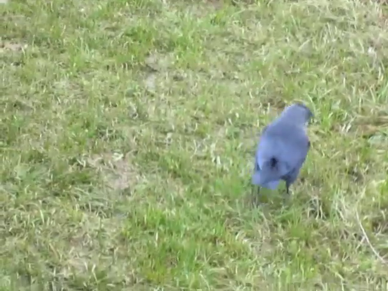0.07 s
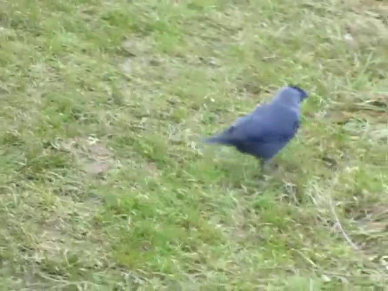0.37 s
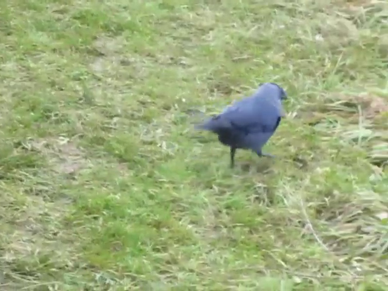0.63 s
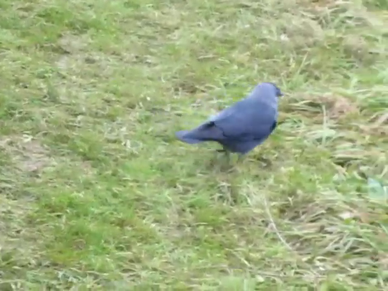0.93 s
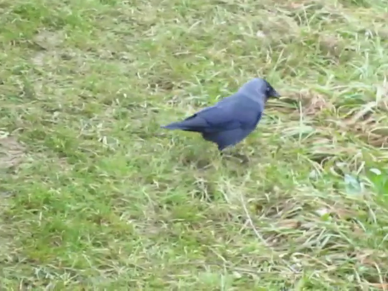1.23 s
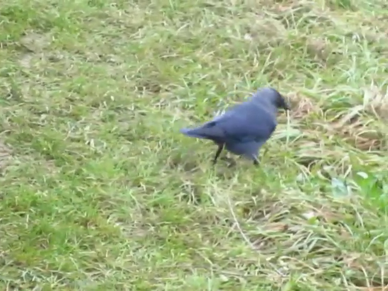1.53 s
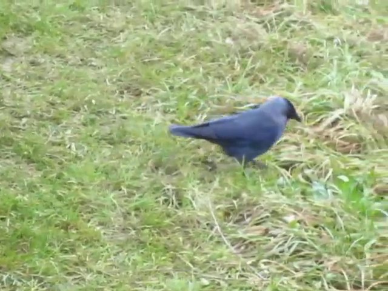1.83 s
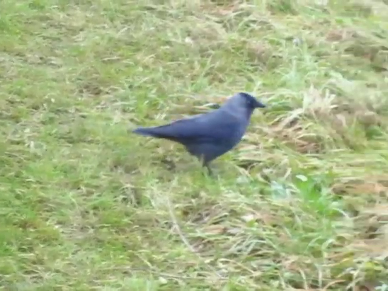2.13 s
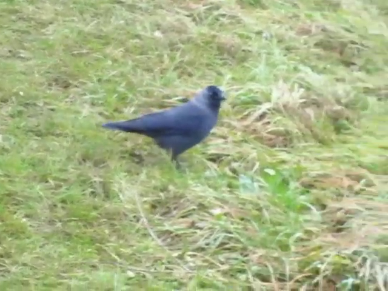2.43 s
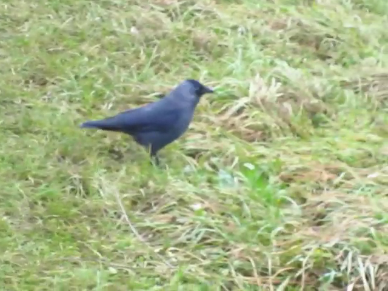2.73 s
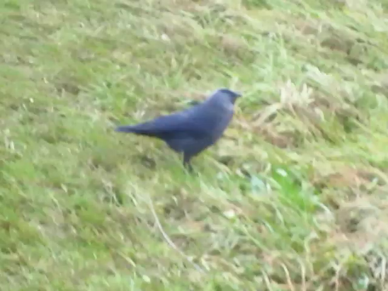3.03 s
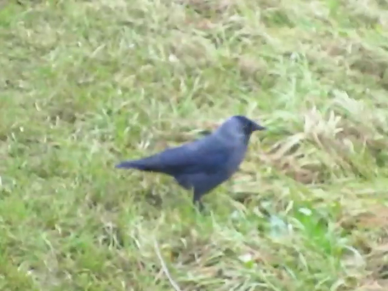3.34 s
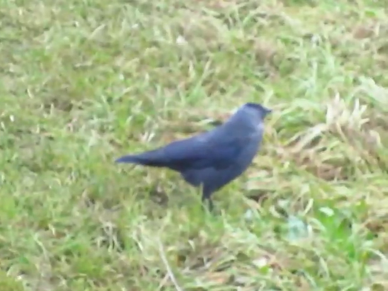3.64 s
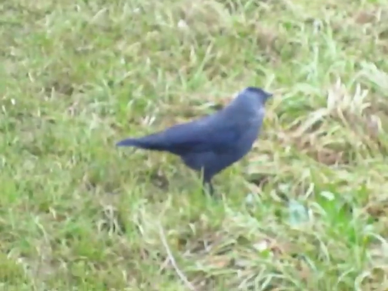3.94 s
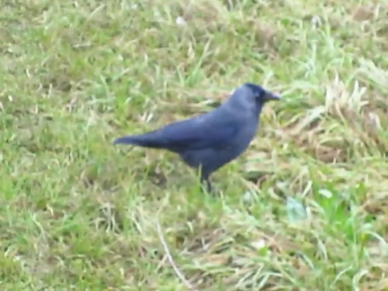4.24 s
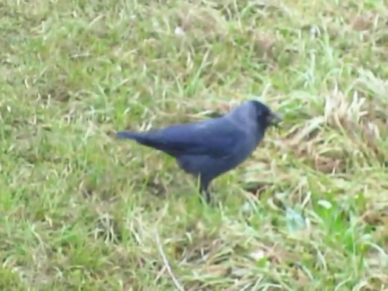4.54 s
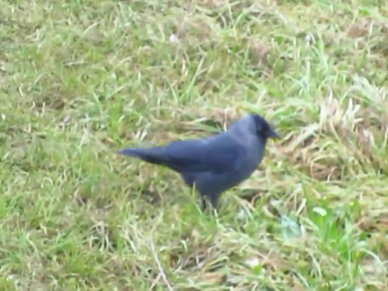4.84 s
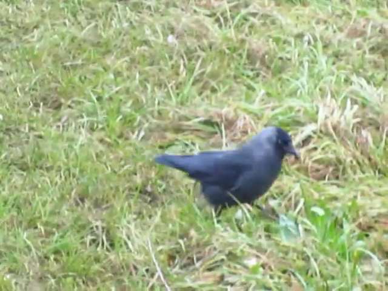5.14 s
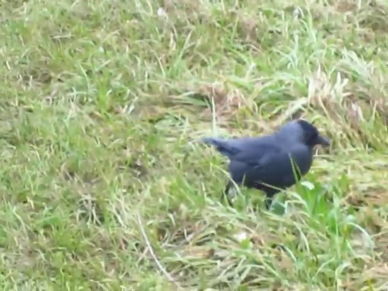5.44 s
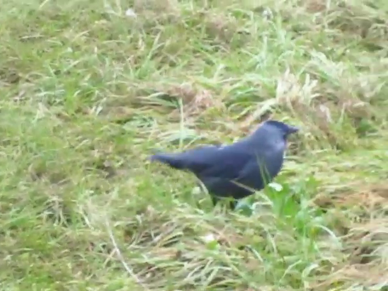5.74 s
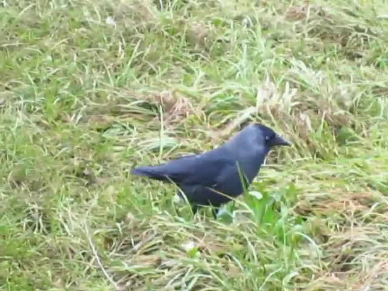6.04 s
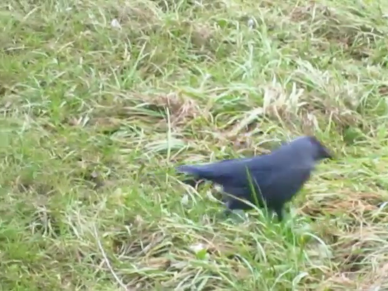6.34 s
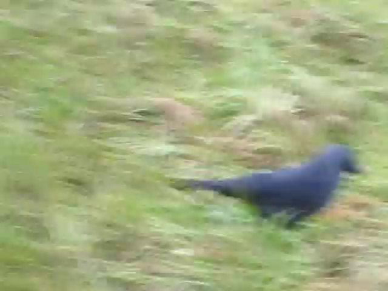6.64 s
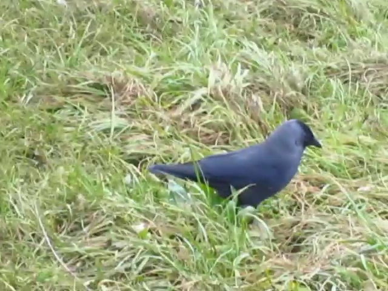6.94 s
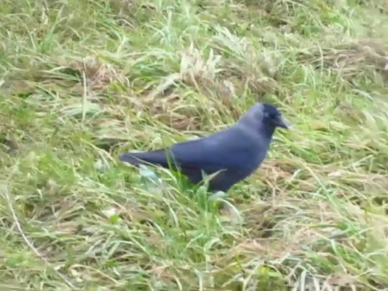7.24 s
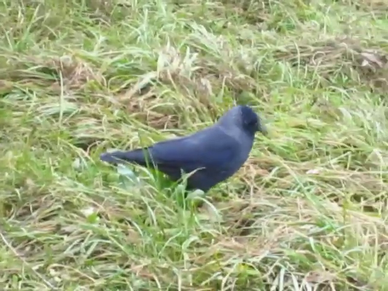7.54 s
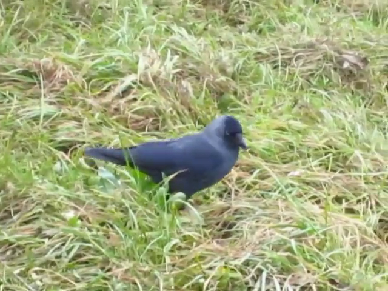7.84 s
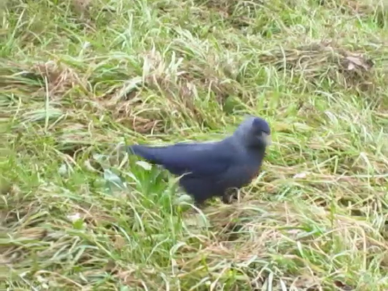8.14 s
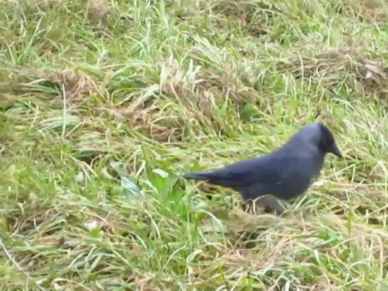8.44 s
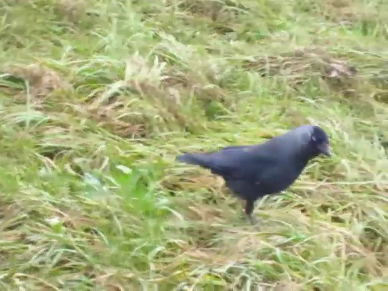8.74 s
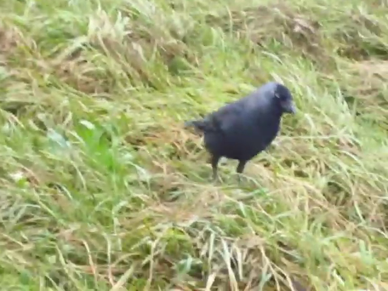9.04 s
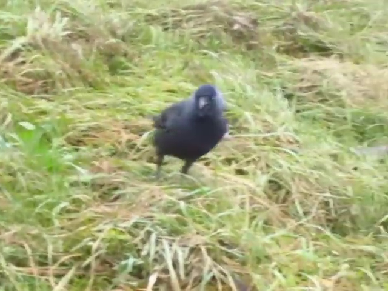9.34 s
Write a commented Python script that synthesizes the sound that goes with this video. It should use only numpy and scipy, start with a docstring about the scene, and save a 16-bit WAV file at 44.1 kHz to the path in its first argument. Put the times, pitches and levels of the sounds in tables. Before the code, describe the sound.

A jackdaw on a lawn, a few metres away, gives short, sharp calls, some single and some in quick clusters with a raspy edge. Midway, a distant crow caws four times with an echo, and other jackdaws answer faintly. Far traffic rumbles softly throughout. Light wind puffs on the microphone, and the hand-held device gives a few small plastic ticks.

```python
"""A jackdaw on a lawn, a few metres from a hand-held camera, calls a sharp "kya" and "tchak-a":
pulses from its syrinx ring in throat and beak, and turn rough where the voice breaks.
Far off, other jackdaws answer faintly and a crow caws four times, echoed by walls or tree lines.
Distant traffic rumbles under it all. Close up, light wind puffs on the two microphones
and the camera's plastic shell ticks now and then."""
import sys
import numpy as np
from scipy import signal
from scipy.fft import rfft, irfft, next_fast_len
from scipy.io import wavfile
from scipy.ndimage import uniform_filter1d

SR = 44100
rng = np.random.default_rng(int(sys.argv[2]) if len(sys.argv) > 2 else 0)


def unload_audio(sound):
    """Save the sound as a 16-bit wav file, at the path given as the first command line argument."""
    columns = np.transpose(np.atleast_2d(sound))
    # keep every value between -1 and 1, then stretch to whole-number steps
    steps = np.round(np.clip(columns, -1, 1) * 32767)
    wavfile.write(sys.argv[1], SR, steps.astype(np.int16))


N = 422478
T = np.arange(N) / SR
TOP_HZ = 15750  # upper limit of the voices and of the camera

# spectrum of distant traffic and air: f/Hz, relative level/dB
AIR_SPECTRUM = [(12, -41), (20, -28), (64, -0.5), (101, -4), (238, -1), (266, -6), (315, -10.5),
                (597, -13.5), (932, -14), (1630, -22), (3540, -40.5), (6540, -42.5), (9930, -50),
                (12100, -66.5), (15500, -50.5)]
# likeness of that noise at the two microphones: f/Hz, coherence/0-1
COHERENCE = [(30, .6), (70, 0.67), (150, 0.97), (300, 0.6), (700, 0.38), (1400, 0.54), (2800, 0),
             (15000, 0.03)]
# swell of the road rumble, taken relative to its median: t/s, level/dB
RUMBLE_SWELL = [(0, -49), (1, -50.5), (2, -48), (3.6, -48.5), (4.5, -48.5), (6, -50.5), (7.2, -50),
                (8.5, -50.5), (9.58, -50)]
# swell of a far engine: t/s, level/dB
ENGINE_SWELL = [(0, -70), (.7, -50), (2.6, -57), (3.5, -47), (4.1, -47.5), (4.6, -60), (9.58, -60.5)]
# partials of that engine: f/Hz, relative level/dB
ENGINE_PARTIALS = [(78, -1.5), (159, -7.5), (237, -9)]
# puffs of wind on the microphones: middle t/s, length/s, level/dB
PUFFS = [(.15, .5, -40), (.58, .25, -39), (1.03, .5, -39), (2.72, .15, -49), (3.08, .25, -47),
         (4.62, .25, -45), (5.37, .2, -48), (7.04, .13, -37), (7.68, .16, -37)]
# spectrum of a puff: f/Hz, relative level/dB
BUFFET = [(20, -14), (45, -3), (70, 1.5), (100, -2.5), (150, -6.5), (250, -27.5), (600, -52.5),
          (2000, -74)]
# ticks of the camera: t/s, peak level/dB, ring f/Hz, ring boost/dB
CAMERA_TICKS = [(1.247, -49, 3800, 16), (2.516, -39.5, 1700, 25), (2.6540, -24.5, 2000, -3),
                (2.7070, -34, 2820, 12), (3.0140, -38.5, 3800, 3), (3.0714, -42, 3020, 20),
                (4.395, -40, 2500, 22), (7.96, -42.5, 7000, 4)]
# response of its shell: f/Hz, gain/dB
SHELL_RESPONSE = [(300, -34), (900, -3), (1800, 0.5), (4000, -11), (6500, -10), (9500, -22), (12000, -45),
                  (15000, -40)]
# far crow's caws: t/s, length/s, top f/Hz, level/dB, rattle depth/0-1
CROW_CAWS = [(3.498, 0.17, 332.5, -45, 0.1), (4.164, 0.16, 347.5, -44, 0.24), (4.842, .205, 343, -41, 0.15),
             (5.588, 0.22, 345.3, -41.5, 0.26)]
# crow's throat, heard from afar: f/Hz, gain/dB
CROW_RESPONSE = [(300, -54), (900, -5.5), (1300, -8.5), (1800, 7), (2550, 3), (2950, -7.5), (3400, -19.5),
                 (4500, -27.5), (7800, -26.5), (10500, -49), (13000, -73)]
# echoes from far walls or tree lines: delay/s, gain/dB
CROW_ECHOES = [(.15, -8), (.47, -17)]
# they return only the middle of the voice: f/Hz, gain/dB
ECHO_RESPONSE = [(1000, -3.5), (1550, 3.5), (1900, -2), (2400, -18), (5000, -37)]
# far jackdaws' falling notes: t/s, length/s, top f/Hz, last f/Hz, level/dB, fundamental gain/dB
FAR_NOTES = [(2.24, 0.032, 1200, 980, -60.5, 5), (4.72, 0.0195, 1134, 970, -43, 47),
             (4.747, 0.049, 1150, 910, -56, 9), (7.534, 0.036, 1260, 904, -56, 0),
             (7.557, 0.043, 1180, 1010, -57, 6), (7.617, 0.011, 1200, 1130, -49, 0)]
# jackdaw's throat and beak: f/Hz, gain/dB
JACKDAW_RESPONSE = [(150, -58), (400, -22), (950, -20), (1450, -27), (1900, -0.5), (2350, 1), (2900, -9),
                    (3500, -18), (4400, -18.5), (6800, -22), (8500, -31.5), (10200, -41), (11800, -71),
                    (14200, -54), (15700, -68)]
# near jackdaw's clear notes: t/s, length/s, top f/Hz, last f/Hz, place of the top/0-1, level/dB,
# fade/dB, gains of (fundamental, upper throat band, treble, top octave)/dB, share before the break/0-1
CLEAR_NOTES = [(.4469, 0.068, 1165, 880, .53, -18.5, 29, 9, -0.5, -2.5, -19, 0.72),
               (.579, 0.019, 864, 860, 0.8, -30.5, 6, 6, 1, -9, 0, .1),
               (0.5938, 0.043, 1065, 904, 0.23, -25.5, 26, 9, -10, -17, -1, 0.13),
               (2.8765, 0.0386, 854, 775, 0.63, -31.5, -1.5, 3, 12, 5.5, -1.5, 0.67),
               (2.915, 0.053, 999, 932, 0, -27, 9, 11.5, 7.5, 0, -7, 1),
               (2.96, 0.057, 945, 810, .25, -31, 19.5, 12, -24, -12, -2, 0.065),
               (4.4992, 0.068, 1233, 1040, 0.3, -21, 31, 5, -22, -13.5, 0.5, 0.54),
               (4.6454, 0.037, 1168, 927, 0.12, -28, 23, 6, -5, -18, 7, 0.8),
               (5.2662, 0.069, 982, 665, 0.11, -27.5, 20, 17, 2.5, -1, -1.5, 0.67),
               (6.4681, 0.073, 1086, 885, 0.23, -26.5, 4.5, 11.5, 13, 3.5, -3.5, 1),
               (6.54, .085, 896, 788, 0, -34.5, 11.5, 15, -11, -9, -7, .7),
               (7.6523, 0.088, 1117, 793, 0.2, -25, 19.5, 12, 4.5, 8.5, 1.5, 0.94),
               (8.9371, 0.072, 1054, 693, 0.15, -22.5, 23.5, 5, -9.5, -0.5, 0.5, .7),
               (9.261, 0.062, 1330, 1040, 0.58, -21, 33, 14, -1.5, -2.5, -1, 0.44),
               (9.41, 0.038, 1152, 950, 0.24, -24.5, 23, 1.5, -17, -13.5, 3, 0.95)]
# its rasps, the second syllable of "tchak-a": t/s, length/s, top f/Hz, last f/Hz, level/dB, fade/dB,
# gains of (fundamental, upper throat band)/dB, roughness/0-1
RASP_NOTES = [(.5286, 0.055, 963, 803, -30.5, -4, 12, 3, 0.4),
              (4.5772, 0.066, 977, 748, -27, 14.5, 10, 5, .11),
              (9.3443, 0.064, 993, 646, -23, 16, 0.5, -7, 0.2)]
# its balance at the microphones: f/Hz, left minus right/dB
BALANCE = [(1200, -1.5), (2200, -4.0), (3200, -4.5), (5000, -6.0), (9000, -8.0), (14000, 4)]


def undb(db):
    """Decibels to gain."""
    return 10 ** (np.asarray(db) / 20)


def unit(x):
    """Scale to rms 1."""
    return x / np.sqrt(np.mean(x ** 2))


def opposed(x):
    """Plus on the left, minus on the right."""
    return x * np.array([[1], [-1]])


def pan(db):
    """Two gains, left minus right in dB: negative leans right."""
    return undb(opposed(db) / 2)


def along(points, hz):
    """Read (f/Hz, value) points on a log-frequency axis."""
    f, v = np.transpose(points)
    return np.interp(np.log(np.maximum(hz, 1)), np.log(f), v)


def colour(x, db_at):
    """Causal filter whose gain in dB is a function of frequency."""
    size = 2 * next_fast_len(len(x) // 2 + 1024)
    cepstrum = irfft(np.log(undb(db_at(np.fft.rfftfreq(size, 1 / SR)))))
    cepstrum[1:size // 2] *= 2
    cepstrum[size // 2 + 1:] = 0
    return irfft(rfft(x, size) * np.exp(rfft(cepstrum)))[:len(x)]


def wander(size, rate):
    """Random values joined by lines, rate a second, spread near 1."""
    steps = np.arange(size) * rate / SR
    count = int(steps[-1]) + 2
    return np.interp(steps, np.arange(count), rng.standard_normal(count))


def add(out, s, x):
    """Mix a sound in at s seconds."""
    i = int(s * SR)
    out[i:i + len(x)] += x[:len(out) - i]


def scatter(x, t60, onset_s, dull_hz):
    """Late, dull scatter from trees and walls, different at each microphone."""
    t = np.arange(SR) / SR
    shape = np.clip(t / onset_s, 0, 1) ** 2 * np.exp(-np.log(1000) * t / t60)
    lowpass = signal.butter(4, dull_hz, fs=SR, output="sos")
    tails = signal.sosfilt(lowpass, rng.standard_normal((2, SR))) * shape
    tails /= np.sqrt(np.sum(shape ** 2))
    return signal.fftconvolve(x[None], tails, axes=1)[:, :N]


def traffic(air_db=-45.5, rumble_hz=320, hiss_hz=2500):
    """A far road, slightly to the right: rumble and an engine drone under a smooth, wide hiss."""
    f = np.fft.rfftfreq(N, 1 / SR)
    like = np.clip(along(COHERENCE, f), 0, 1)
    mid, side = rfft(rng.standard_normal((2, N))) * undb(along(AIR_SPECTRUM, f))
    spectra = (mid + opposed(side * np.sqrt((1 - like) / (1 + like)))) / np.std(irfft(mid, N))
    low = 1 / (1 + (f / rumble_hz) ** 4)
    high = 1 - 1 / (1 + (f / hiss_hz) ** 4)
    swell_db = np.interp(T, *np.transpose(RUMBLE_SWELL))
    swell_db -= np.median(swell_db)
    rumble = irfft(spectra * low, N) * undb(swell_db + wander(N, 5.7))
    road = irfft(spectra * (1 - low - high), N) * undb(0.76 * swell_db + .5 * wander(N, 4.3))
    hiss = irfft(spectra * high, N)
    return (undb(air_db) * (rumble + road + hiss) + engine()) * pan(-2)


def engine(waver=0.0197, flutter_db=3):
    """A far engine drones on three low partials, each unsteady in pitch and level."""
    swell_db = np.interp(T, *np.transpose(ENGINE_SWELL))
    drone = np.zeros(N)
    for hz, db in ENGINE_PARTIALS:
        phase = 2 * np.pi * np.cumsum(hz * (1 + waver * wander(N, 12))) / SR
        drone += undb(db + swell_db + flutter_db * wander(N, 7.3)) * np.sin(phase)
    return drone


def wind(shared_db=-9):
    """Soft low puffs push the two microphones mostly in opposite directions."""
    swell = sum(undb(db) * np.exp(-(2 * (T - s) / length) ** 2) for s, length, db in PUFFS)
    mid, side = (unit(colour(rng.standard_normal(N), lambda f: along(BUFFET, f))) for _ in range(2))
    return swell * (undb(shared_db) * mid + opposed(side))


def camera_ticks(snap_s=0.000082, ring_s=0.002, ring_share=0.21):
    """Small dry snaps of the plastic shell, right at the microphones."""
    out, t = np.zeros(N), np.arange(1024) / SR
    decay = np.exp(-t / snap_s) + ring_share * np.exp(-t / ring_s)
    for s, db, ring_hz, ring_db in CAMERA_TICKS:
        snap = rng.standard_normal(len(t)) * decay
        ring = lambda f: ring_db * np.exp(-((f - ring_hz) / 900) ** 2)
        tick = colour(snap, lambda f: along(SHELL_RESPONSE, f) + ring(f))
        add(out, s, undb(db) * tick / np.abs(tick).max())
    return out * pan(-1)


def syrinx(hz, fundamental_db=0):
    """A bird's sharp pulses: the fundamental, a stack of equal overtones, and their phase."""
    phase = 2 * np.pi * np.cumsum(hz) / SR
    k = np.arange(2, int(TOP_HZ / hz.min()) + 1)[:, None]
    overtones = np.sum(np.cos(k * phase) * (k * hz < TOP_HZ), axis=0)
    return undb(fundamental_db) * np.cos(phase), overtones, phase


def far_crow(rattle_hz=82, sag=0.56, crest=.62, jitter=0.0518, hoarse=3, scatter_db=-4):
    """Hoarse caws, far off and slightly to the right: uneven pulses arch in pitch and rattle fast."""
    out = np.zeros(N)
    for s, length, top_hz, db, rattle in CROW_CAWS:
        size = int(length * SR)
        u = np.linspace(0, 1, size)
        hz = top_hz * (1 - sag * (u - crest) ** 2) * np.exp(jitter * wander(size, 502))
        fundamental, overtones, phase = syrinx(hz)
        pulses = fundamental + overtones + hoarse * rng.standard_normal(size) * (1 + np.cos(phase))
        pulses *= 1 + rattle * np.cos(2 * np.pi * rattle_hz * np.cumsum(hz / top_hz) / SR)
        swell = np.interp(u, [0, .25, crest, .85, 1], [0, 0.66, 1, 0.7, 0.23])
        wide = unit(colour(pulses, lambda f: along(CROW_RESPONSE, f)))
        # the upper resonance only comes through once the beak is wide open
        narrow = colour(wide, lambda f: along([(1800, 8.5), (2700, -7.5)], f))
        add(out, s, undb(db) * swell * (narrow + swell * (wide - narrow)))
    returned = colour(out, lambda f: along(ECHO_RESPONSE, f))
    echo = np.zeros(N)
    for delay_s, db in CROW_ECHOES:
        add(echo, delay_s, undb(db) * returned)
    return (out + echo) * pan(-2) + undb(scatter_db) * scatter(out, t60=6.4, onset_s=0.05, dull_hz=1810)


def pitch_arch(length, top_hz, last_hz, crest, climb=0.16, bend_rad=2.9):
    """A jackdaw's pitch climbs to its top, then sinks as the push gives out."""
    u = np.linspace(0, 1, int(length * SR))
    crest = np.clip(crest, .01, .9)
    before = np.clip(1 - u / crest, 0, 1)
    after = np.clip((u - crest) / (1 - crest), 0, 1)
    fall = (1 - np.cos(bend_rad * after)) / (1 - np.cos(bend_rad))
    return top_hz * (1 - climb * crest * before ** 2) + (last_hz - top_hz) * fall


def envelope(length, db, fade_db, power=2.67, release_s=0.0021):
    """Gain of a note: attack, a hold that turns into a fade, quick release."""
    t = np.linspace(0, length, int(length * SR))
    attack_s = min(0.0037 * 2 ** ((-18.5 - db) / 11.5), 0.011)  # the louder, the sharper
    attack = np.sin(np.pi / 2 * np.clip(t / attack_s, 0, 1)) ** 2
    release = np.clip((length - t) / release_s, 0, 1)
    return attack * release * undb(db - fade_db * (t / length) ** power)


def jackdaw_voice(hz, fundamental_db, upper_db, treble_db, top_db, clean, halves, rough,
                  jitter=0.11, shimmer=0.42, snap_s=0.0032, dulling_db=14):
    """One note at even level: after its clean share it breaks into uneven strong and weak pulses."""
    size = len(hz)
    u = np.linspace(0, 1, size)
    broken = np.clip((u - clean) * 20 + 1, 0, 1)
    # the first pulses are uneven too, which opens the note with a snap
    unrest = 0.072 + broken * rough + 0.57 * np.exp(-np.arange(size) / SR / snap_s)
    hz = hz * np.exp(jitter * unrest * wander(size, 900))
    # every second pulse comes late and weak, which puts lines halfway between the harmonics
    limp = .3 * halves * broken * np.sin(np.pi * np.cumsum(hz) / SR)
    fundamental, overtones, phase = syrinx(hz * (1 + limp), fundamental_db)
    half_pitch = halves * broken * np.cos(phase / 2)
    overtones *= (1 + .5 * half_pitch) * np.exp(shimmer * unrest * wander(size, 1100))
    hiss = .7 * unrest * rng.standard_normal(size) * (1 + np.cos(phase))
    pulses = fundamental + 0.8 * half_pitch + overtones + hiss

    def throat(shelf_db):
        """The pulses through throat and beak, with a treble shelf."""
        upper = lambda f: upper_db * np.exp(-((f - 3100) / 450) ** 2)
        treble = lambda f: shelf_db * np.clip((f - 3200) / 1200, 0, 1)
        top = lambda f: top_db * np.clip((f - 6500) / 2000, 0, 1)
        return colour(pulses, lambda f: along(JACKDAW_RESPONSE, f) + upper(f) + treble(f) + top(f))

    bright, dull = throat(treble_db), throat(treble_db - dulling_db)
    # the beak closes towards the end, which dulls the voice
    beak = np.interp(u, [0, .25, .7, 1], [1, 1, 0.69, 0.11])
    voice = dull + beak * (bright - dull)
    return voice / np.sqrt(uniform_filter1d(voice ** 2, size=300) + 1e-12)


def far_jackdaws(scatter_db=-9):
    """Answers from further off: the same voice, faint and dull, with more scatter."""
    out = np.zeros(N)
    for s, length, top_hz, last_hz, db, fundamental_db in FAR_NOTES:
        hz = pitch_arch(length, top_hz, last_hz, crest=0.042)
        voice = jackdaw_voice(hz, fundamental_db, upper_db=-8, treble_db=-14, top_db=-2,
                              clean=0, halves=.1, rough=0.23)
        add(out, s, voice * envelope(length, db, fade_db=1))
    return out + undb(scatter_db) * scatter(out, t60=.5, onset_s=0.0073, dull_hz=2800)


def near_jackdaw(scatter_db=-33):
    """Clear notes and rasps from the lawn, a few metres off and a little to the right."""
    out = np.zeros(N)
    for s, length, top_hz, last_hz, crest, db, fade_db, *tone_db, clean in CLEAR_NOTES:
        hz = pitch_arch(length, top_hz, last_hz, crest)
        voice = jackdaw_voice(hz, *tone_db, clean, halves=0.13, rough=0.33)
        add(out, s, voice * envelope(length, db, fade_db))
    # a rasp is dull, breaks almost at once, scoops up early and holds its level longer
    for s, length, top_hz, last_hz, db, fade_db, *tone_db, rough in RASP_NOTES:
        hz = pitch_arch(length, top_hz, last_hz, crest=.28, climb=.42)
        voice = jackdaw_voice(hz, *tone_db, treble_db=-13, top_db=3.5, clean=0.047, halves=1, rough=rough)
        add(out, s, voice * envelope(length, db, fade_db, power=10.3))
    balance_db = along(BALANCE, np.fft.rfftfreq(N, 1 / SR))
    direct = irfft(rfft(out) * pan(balance_db), N)
    return direct + undb(scatter_db) * scatter(out, t60=0.72, onset_s=0.013, dull_hz=3400)


def scene():
    """The lawn from the camera: birds, shell ticks, wind and the far road."""
    return near_jackdaw() + far_jackdaws() + far_crow() + camera_ticks() + wind() + traffic()


def record(dry):
    """The camera cuts the highest treble steeply."""
    return signal.sosfilt(signal.ellip(10, .2, 70, TOP_HZ, fs=SR, output="sos"), dry)


dry = scene()
out = record(dry)
unload_audio(out)
```